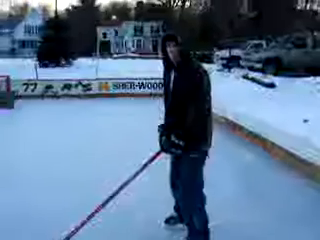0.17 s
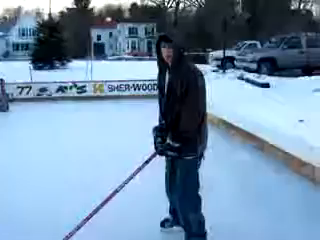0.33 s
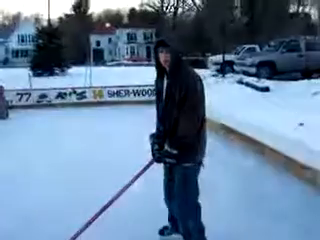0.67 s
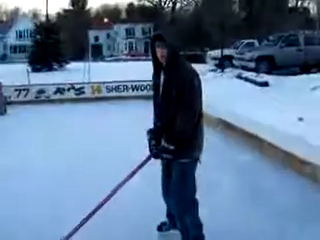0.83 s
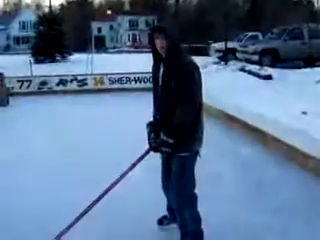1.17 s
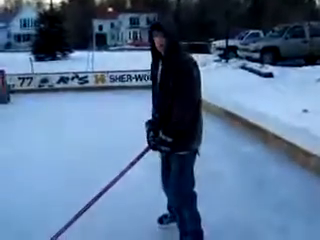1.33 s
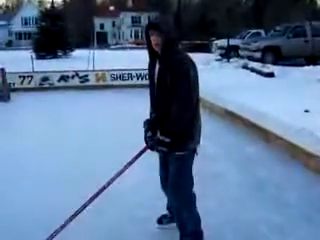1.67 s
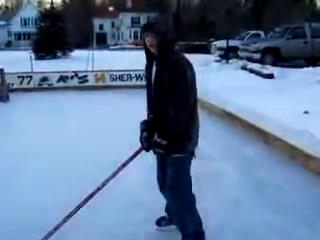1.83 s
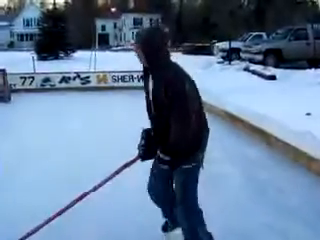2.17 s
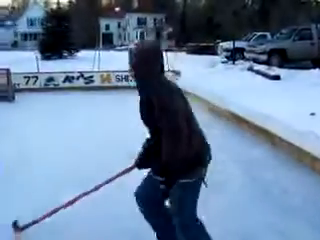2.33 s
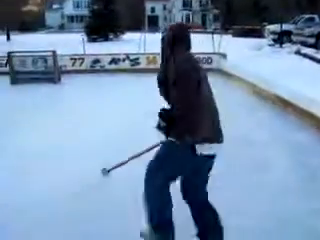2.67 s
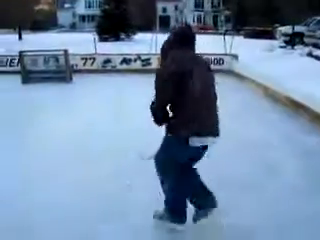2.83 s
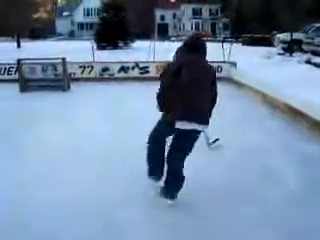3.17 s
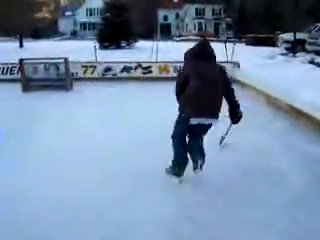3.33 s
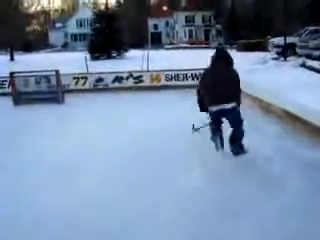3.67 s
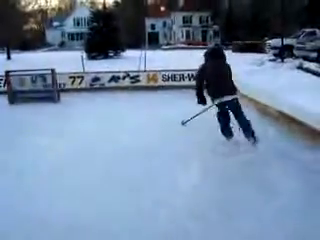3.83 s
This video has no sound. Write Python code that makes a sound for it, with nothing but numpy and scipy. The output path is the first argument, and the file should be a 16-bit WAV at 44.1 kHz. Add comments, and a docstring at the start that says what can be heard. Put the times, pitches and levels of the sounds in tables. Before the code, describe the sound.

After faint still air and a tiny knock, a skate edge grinds harshly across ice, stops, then uneven blade knocks, crisp chips and brief scrapes follow outdoors, with light wind and a quick faint echo.

```python
"""A small outdoor rink in still winter air: a skater stands, turns with one long loud scrape and skates away.
The scrape and the pushes are friction noise: dense random fractures of the ice, coloured by blade and boot.
Knocks of blade and boot are impulses that ring damped modes; chips are brief band-limited noise bursts.
A quick dull echo and faint scatter follow; air, light wind and a faint steady whine lie beneath."""
import sys
import numpy as np
from scipy import signal
from scipy.fft import rfft, irfft
from scipy.io import wavfile

SR = 44100
rng = np.random.default_rng(int(sys.argv[2]) if len(sys.argv) > 2 else 0)


def to_wav(sig):
    """Store sig (one row per channel, or 1-D mono) as 16-bit WAV at the path in sys.argv[1].

    Samples outside -1..1 are clipped; the rate is SR.
    """
    pcm = np.clip(np.atleast_2d(sig), -1, 1) * 32767
    pcm = np.round(pcm).astype(np.int16)
    wavfile.write(sys.argv[1], SR, pcm.T)  # frames by channels


N = 176400
TIME = np.arange(N) / SR


def from_db(db):
    """Decibel law: amplitude ratio of a level in dB."""
    return 10 ** (np.asarray(db) / 20)


def rms_one(x):
    """Normalisation to unit effective value."""
    return x / np.sqrt(np.mean(x ** 2) + 1e-20)


def level(rows):
    """Amplitude envelope: gain along a dB curve, fading exponentially beyond its ends."""
    s, db = np.transpose(rows)
    beyond_s = abs(TIME - np.clip(TIME, s[0], s[-1]))
    return from_db(np.interp(TIME, s, db)) * np.exp(-beyond_s / .01)


def colour(x, points):
    """Linear filtering: a steady signal takes on a spectral envelope; rms 1."""
    hz, db = np.transpose(points)
    log_hz = np.log(hz)
    f = np.log(np.maximum(np.arange(N // 2 + 1) * SR / N, 1))
    beyond = abs(f - np.clip(f, log_hz[0], log_hz[-1]))
    gain = from_db(np.interp(f, log_hz, db)) * np.exp(-2 * beyond)
    return rms_one(irfft(rfft(x) * gain, N))


def resonate(x, hz, width_hz):
    """Damped oscillator: one resonance with gain 1 at its peak."""
    r = np.exp(-np.pi * width_hz / SR)
    zeros = np.array([1, 0, -1]) * (1 - r * r) / 2
    poles = [1, -2 * r * np.cos(2 * np.pi * hz / SR), r * r]
    return signal.lfilter(zeros, poles, x + 1e-18)  # the tiny offset keeps silence from being exactly zero


def drift(rate_hz):
    """Low-passed noise: slow random fluctuation of rms 1."""
    slow = signal.butter(2, rate_hz, fs=SR, output="sos")
    return rms_one(signal.sosfilt(slow, rng.standard_normal(N + SR))[SR:])


# (frequency [Hz], relative density [dB]) of the still air
AIR_COLOUR = [(25, -1), (50, -3), (100, -5), (180, -6), (280, -9), (420, -14), (750, -12), (1000, -16),
              (1400, -21), (3000, -23), (7000, -25), (9000, -27), (10200, -31)]
AIR_DB = -60


def air():
    """Stationary noise: a steady random pressure with the spectrum of still air."""
    return from_db(AIR_DB) * colour(rng.standard_normal(N), AIR_COLOUR)


# course of the light wind: (time [s], level [dB])
WIND_LEVEL = [(0, -80), (1.6, -74), (1.79, -55), (1.87, -69), (2.4, -63), (2.9, -60), (3.4, -56),
              (3.8, -59), (4.0, -55)]
# spectrum of the wind: (frequency [Hz], relative density [dB])
WIND_SPECTRUM = [(15, -8), (35, 0), (70, -3), (130, -12), (300, -35)]


def wind():
    """Amplitude-modulated noise: low rumble that rises and falls."""
    return level(WIND_LEVEL) * colour(rng.standard_normal(N), WIND_SPECTRUM)


WHINE_HZ, WHINE_PEAK_DB = 7560, -79


def whine():
    """Pure tone: one faint steady sinusoid."""
    return from_db(WHINE_PEAK_DB) * np.sin(2 * np.pi * WHINE_HZ * TIME)


# blows of blade and boot on the ice, levels over 10 ms before the part trims:
# (time [s], thump [dB], clack [dB], rap [dB], tick [dB], clack pitch [Hz])
BLOWS = [(0.7045, -58, -46, -53, -65, 1270), (1.9045, -54, -52, -54, -62, 1100),
         (2.0115, -47, -52, -49, -54, 1240), (2.752, -33, -32, -37, -48, 980),
         (2.7695, -34, -37, -44, -50, 930), (2.8775, -29, -28, -32, -36, 960),
         (2.9955, -48, -43, -45, -57, 1150), (3.0195, -48, -53, -48, -54, 1140),
         (3.086, -33, -35, -41, -36, 860), (3.11, -42, -41, -58, -52, 990),
         (3.1675, -47, -43, -50, -51, 1050), (3.1785, -41, -35, -45, -47, 1070),
         (3.2145, -38, -28, -40, -40, 1040), (3.236, -43, -40, -50, -59, 1030),
         (3.2465, -47, -40, -51, -54, 1040), (3.26, -46, -37, -49, -55, 1030),
         (3.3735, -32, -35, -41, -38, 950), (3.416, -50, -38, -44, -47, 950),
         (3.482, -39, -30, -38, -43, 1040), (3.508, -46, -40, -51, -49, 930),
         (3.518, -46, -42, -46, -50, 1080), (3.54, -34, -35, -35, -40, 880),
         (3.554, -40, -30, -43, -49, 860), (3.717, -47, -41, -50, -52, 1050),
         (3.7335, -41, -32, -41, -42, 1020), (3.74, -44, -30, -47, -44, 960),
         (3.7635, -41, -39, -46, -50, 1090), (3.7915, -45, -40, -50, -53, 1040),
         (3.8115, -41, -37, -51, -56, 950), (3.866, -41, -40, -46, -49, 1070),
         (3.923, -46, -39, -47, -48, 1090)]
# damped modes of the skate: (frequency [Hz], relative level [dB], decay time t60 [s],
# part [0 thump, 1 clack, 2 rap, 3 tick])
SKATE_MODES = [(175, -7, .024, 0), (250, 0, .024, 0), (315, -5, .018, 0), (830, -1, .006, 1),
               (1060, 0, .007, 1), (1900, 0, .004, 2), (3500, -9, .003, 2), (4800, -8, .003, 2),
               (6700, 0, .003, 3), (8000, -3, .002, 3)]
# trims of thump, clack, rap and tick: (level [dB]) each
PART_TRIM_DB = [.8, 1, 1, .5]
CRUSH_S, CRUSH_DB = .0015, -6  # decay of the crumbling ice; its energy relative to the click
CLACK_HZ = 1020  # clack pitch at which the tabled modes hold
MODE_Q, MODE_SPREAD_DB = 1.25, 1.2  # focus of each mode; random spread of its strength from blow to blow


def blow_on_ice(t):
    """Impulsive excitation: a click with a brief crumble of ice after it."""
    crumble = rng.standard_normal(len(t)) * np.exp(-t / CRUSH_S)
    blow = crumble * from_db(CRUSH_DB) / np.linalg.norm(crumble)
    blow[0] += 1
    return blow


def ring_of_part(blow, wanted_part, shift):
    """Modal superposition: the blow rings all damped modes of one part."""
    ring = 0
    for hz, mode_db, t60, part in SKATE_MODES:
        if round(part) != wanted_part:
            continue
        width_hz = np.log(1000) / np.pi / t60
        focused = resonate(blow, hz * shift, hz / MODE_Q)
        strength = from_db(mode_db + MODE_SPREAD_DB * rng.standard_normal())
        ring = ring + strength * resonate(focused, hz * shift, width_hz)
    return ring


def knocks():
    """Impact sound: each blow rings the damped modes of the skate as thump, clack, rap and tick."""
    out, t = np.zeros(N + SR), TIME[:SR // 16]
    for s, *parts, clack_hz in BLOWS:
        blow = blow_on_ice(t)
        at = int(s * SR)
        for k, db in enumerate(parts):
            shift = clack_hz / CLACK_HZ if k == 1 else 1
            ring = ring_of_part(blow, k, shift)
            over_10_ms = ring / np.linalg.norm(ring) * np.sqrt(SR / 100)  # rms 1 if held in 10 ms
            out[at:at + len(t)] += from_db(db + PART_TRIM_DB[k]) * over_10_ms
    return out[:N]


RINK_T60_S, RINK_DB, RINK_CUT_HZ = .22, -24, 2500


def rink(x):
    """Diffuse reverberation: faint scatter from the boards and snow banks as a decaying noise response."""
    dull = signal.butter(1, RINK_CUT_HZ, fs=SR, output="sos")
    tail = signal.sosfilt(dull, rng.standard_normal(SR // 2))
    tail *= from_db(-60 * TIME[:SR // 2] / RINK_T60_S)
    return from_db(RINK_DB) * signal.fftconvolve(x, tail / np.linalg.norm(tail))[:N]


STEP_ECHO_S, STEP_ECHO_DB = .0093, -9.5
TURN_ECHO_S, TURN_ECHO_DB = .0071, -18
ECHO_BAND_HZ, ECHO_TOP_HZ = (700, 1900), 3200


def echo(x, delay_s, gain_db):
    """Discrete reflection: one quick delayed copy, dulled by a band-pass and a low-pass."""
    band = signal.butter(1, ECHO_BAND_HZ, "band", fs=SR, output="sos")
    top = signal.butter(2, ECHO_TOP_HZ, fs=SR, output="sos")
    dull = signal.sosfilt(top, signal.sosfilt(band, x + 1e-18))
    return from_db(gain_db) * np.interp(TIME - delay_s, TIME, dull, left=0)


GRAINS_PER_S = 7000  # mean rate of fractures


def fractures(spread_db, clump_db, clump_rate):
    """Random pulse train: tiny breaks in the ice, clicks of uneven size whose strength comes in clumps."""
    born = rng.random(N) < GRAINS_PER_S / SR
    size_db = spread_db * np.minimum(rng.exponential(1, N), 4) + clump_db * drift(clump_rate)
    return born * rng.choice([-1, 1], N) * from_db(size_db)


# blades gliding between strides: (time [s], level [dB])
GLIDE_LEVEL = [(1.6, -85), (1.98, -62), (2.6, -55), (2.73, -60), (2.81, -53), (2.86, -57), (2.95, -50),
               (3.15, -53), (3.35, -53), (3.5, -48), (3.75, -45), (3.92, -48), (4.0, -51)]
# spectrum of the glide: (frequency [Hz], relative density [dB])
GLIDE_SPECTRUM = [(40, -6), (100, -4), (250, 0), (420, -6), (950, -1), (1600, -8), (2500, -14), (4500, -21),
                  (7000, -19), (10000, -26)]


def glide():
    """Sliding friction: quiet, dense, uneven fractures under the run of the blades."""
    breaks = fractures(spread_db=3.5, clump_db=2.6, clump_rate=60)
    return level(GLIDE_LEVEL) * colour(breaks, GLIDE_SPECTRUM)


FLICKER_DB, FLICKER_HZ = 1.6, 22  # the colour shifts as the contact point wanders


def flicker(x):
    """Spectral modulation: each half octave swells and fades on its own; rms 1."""
    spectrum = rfft(x)
    octave = np.log2(np.maximum(np.arange(N // 2 + 1) * SR / N, 1) / 125)
    place = np.clip(2 * octave, 0, 12)  # half octaves above 125 Hz
    out = 0
    for k in range(13):
        band = irfft(spectrum * np.maximum(1 - abs(place - k), 0), N)
        out = out + band * from_db(FLICKER_DB * drift(FLICKER_HZ))
    return rms_one(out)


# the edge pushes off: (start [s], rise [s], hold [s], release [s], level [dB])
PUSH_TIMES = [(1.957, .006, .008, .018, -53), (2.63, .03, .03, .02, -53), (2.885, .01, .03, .06, -48),
              (3.015, .055, .014, .02, -37), (3.24, .035, .025, .025, -39), (3.37, .008, .045, .045, -40),
              (3.528, .011, .022, .05, -33), (3.595, .03, .04, .08, -39), (3.765, .095, .04, .03, -37.5)]
# spectrum of a push: (frequency [Hz], relative density [dB])
PUSH_SPECTRUM = [(70, -19), (160, -4), (270, 3), (330, 0), (420, -11), (560, -4), (820, 2), (1050, 0),
                 (1300, -8), (1650, -5), (2000, -8), (2400, -17), (2800, -11), (3150, -7), (4200, -19),
                 (5400, -16), (7000, -11), (8500, -16), (10200, -24)]


def pushes():
    """Friction under varying load: short scrapes swell and let go with the force on the edge."""
    force = 0
    for s, rise, hold, release, db in PUSH_TIMES:
        corners = s + np.cumsum([0, rise, hold, release])
        force = force + from_db(db) * np.interp(TIME, corners, [0, 1, 1, 0]) ** 1.6
    breaks = fractures(spread_db=3.2, clump_db=2.2, clump_rate=110)
    return force * flicker(colour(breaks, PUSH_SPECTRUM))


# low judder of the boot in the turn: (time [s], level [dB])
JUDDER_LEVEL = [(2.0, -60), (2.2, -55), (2.27, -45), (2.32, -47), (2.39, -42), (2.47, -37.5), (2.53, -36.5),
                (2.6, -38.5), (2.63, -56), (2.73, -68)]
# resonances of the boot: (frequency [Hz], relative density [dB])
BOOT_SPECTRUM = [(60, -36), (140, -13), (245, 1), (320, -3), (420, -12), (570, -11), (720, -19),
                 (1000, -24), (2000, -40)]


def judder(breaks):
    """Forced vibration: the fractures drive the low resonances of the boot."""
    return level(JUDDER_LEVEL) * colour(breaks, BOOT_SPECTRUM)


# pressure of the edge as scrape level, before the steel's rings and trim: (time [s], level [dB])
SCRAPE_LEVEL = [(2.01, -54), (2.08, -47.5), (2.13, -49), (2.205, -45), (2.218, -39), (2.236, -39),
                (2.25, -29.5), (2.295, -33), (2.32, -29.5), (2.386, -26.3), (2.46, -25), (2.492, -35),
                (2.6, -38), (2.634, -50), (2.68, -52), (2.73, -64)]
# resonances of the scraping blade and its holder: (frequency [Hz], relative density [dB])
BLADE_SPECTRUM = [(500, -35), (720, -27), (900, -14), (1130, -4), (1300, -6), (1600, 0), (2100, -8),
                  (2650, -15.5), (3200, -20), (3530, -10), (3820, -7), (4080, -11), (4350, -7), (4600, -11),
                  (5000, -12), (5300, -13), (5750, -23), (7000, -40)]


def blade(breaks):
    """Forced vibration: the fractures drive blade and holder as the edge is pressed."""
    return steel(level(SCRAPE_LEVEL) * flicker(colour(breaks, BLADE_SPECTRUM)))


# narrow rings of the steel, before the trim: (frequency [Hz], width [Hz], added share [dB])
STEEL_MODES = [(1141, 22, -6), (1351, 18, -5), (1497, 18, -3), (1634, 22, -6), (1949, 18, -5),
               (2078, 16, -3), (3565, 60, -9), (3842, 18, -4), (4245, 18, -4), (4361, 20, -5)]
STEEL_TRIM_DB = -.7


def steel(x):
    """Resonance: the blade's lightly damped modes stand out of the scrape."""
    rings = sum(from_db(db) * resonate(x, hz, width) for hz, width, db in STEEL_MODES)
    return from_db(STEEL_TRIM_DB) * (x + rings)


# treble of the turn: (time [s], level [dB])
SHAVINGS_LEVEL = [(2.03, -63), (2.206, -56), (2.254, -35), (2.282, -43), (2.32, -34), (2.462, -36),
                  (2.474, -41), (2.574, -40), (2.636, -62), (2.73, -71)]
# spectrum of the shavings: (frequency [Hz], relative density [dB])
SHAVINGS_SPECTRUM = [(4500, -30), (6000, -12), (6750, -2), (6920, 3), (7100, -2), (7400, -3), (8000, 0),
                     (8800, -5), (9600, -8), (10400, -18)]


def shavings():
    """Granular noise: shavings hiss off the edge as dense high-pitched fractures."""
    spray = fractures(spread_db=1.8, clump_db=1.6, clump_rate=150)
    return level(SHAVINGS_LEVEL) * flicker(colour(spray, SHAVINGS_SPECTRUM))


# the edge biting deeper: (time [s], level [dB])
BITE_LEVEL = [(2.03, -58), (2.3, -56), (2.37, -43), (2.43, -35.5), (2.48, -36), (2.52, -41), (2.59, -41),
              (2.64, -58)]
# lower spectrum of the bite: (frequency [Hz], relative density [dB])
BITE_SPECTRUM = [(400, -16), (560, -9), (700, -13), (860, -2), (1050, 0), (1250, -7), (1600, -24)]


def bite():
    """Load-dependent friction: as the edge bites deeper the scrape spreads down in pitch."""
    breaks = fractures(spread_db=2.4, clump_db=1.8, clump_rate=100)
    return level(BITE_LEVEL) * colour(breaks, BITE_SPECTRUM)


def turn():
    """Common excitation: the same fractures drive blade and boot; bite and shavings have their own."""
    breaks = fractures(spread_db=2.3, clump_db=1.6, clump_rate=130)
    return judder(breaks) + blade(breaks) + shavings() + bite()


# chips cracking off the edge: (time [s], length [s], level [dB], centre [Hz])
CHIP_BURSTS = [(2.584, .005, -40, 8800), (2.88, .009, -36, 2000), (2.881, .008, -33, 7000),
               (2.938, .003, -43, 3000), (3.387, .006, -30, 7000), (3.404, .006, -39, 7200),
               (3.414, .012, -43, 3000), (3.569, .004, -39, 6500), (3.579, .007, -38, 6300),
               (3.613, .008, -27.5, 5600)]
CHIP_Q = 1.3


def chips():
    """Brittle fracture: band-limited noise bursts a few milliseconds long."""
    out = 0
    for s, length, db, hz in CHIP_BURSTS:
        burst = np.interp(TIME, s + length * np.array([0, .3, .75, 1.4]), [0, 1, 1, 0])
        broad = resonate(rng.standard_normal(N), hz, hz / CHIP_Q)
        out = out + from_db(db) * burst * rms_one(resonate(broad, hz, hz))
    return out


def scene():
    """Superposition: direct sounds, their echoes and scatter, and the background add up."""
    background = air() + wind() + whine()
    steps = knocks() + glide() + pushes() + chips()
    scrape = turn()
    echoes = echo(steps, STEP_ECHO_S, STEP_ECHO_DB) + echo(scrape, TURN_ECHO_S, TURN_ECHO_DB)
    return (scrape + steps + echoes + rink(scrape + steps) + background)[None]


START_S, OPENING_S = .122, .008
SOFT_HZ, CUTOFF_HZ = 9700, 10300


def record(dry):
    """Band limitation: the sound sets in after a moment, and two low-passes cut the top."""
    opened = dry * np.clip((TIME - START_S) / OPENING_S, 0, 1)
    soft = signal.sosfilt(signal.butter(6, SOFT_HZ, fs=SR, output="sos"), opened)
    steep = signal.ellip(10, .3, 70, CUTOFF_HZ, fs=SR, output="sos")
    return signal.sosfilt(steep, soft)


dry = scene()
out = record(dry)
to_wav(out)
```